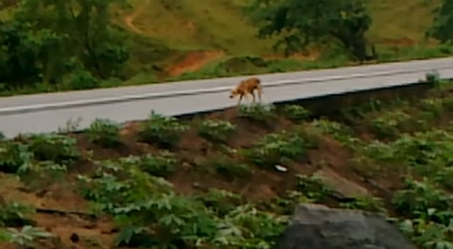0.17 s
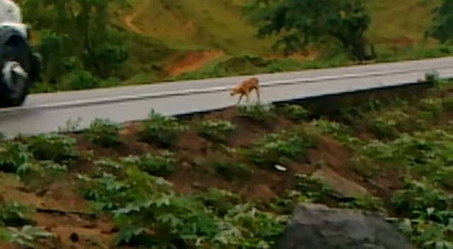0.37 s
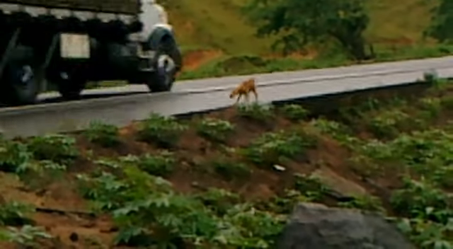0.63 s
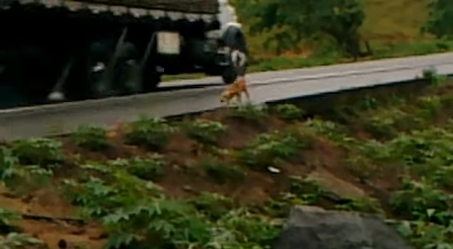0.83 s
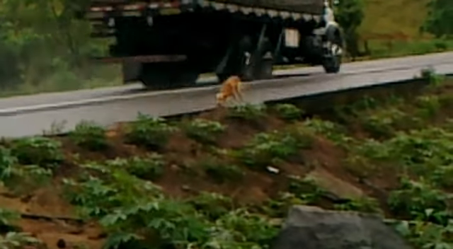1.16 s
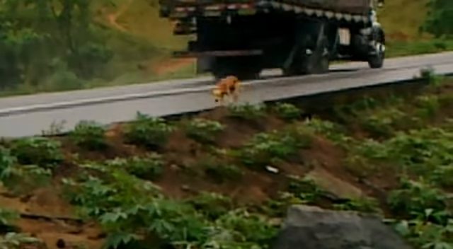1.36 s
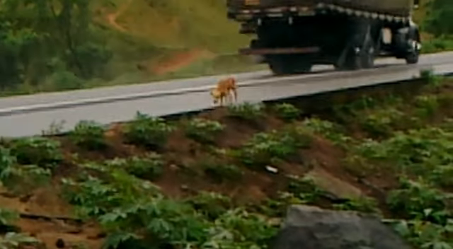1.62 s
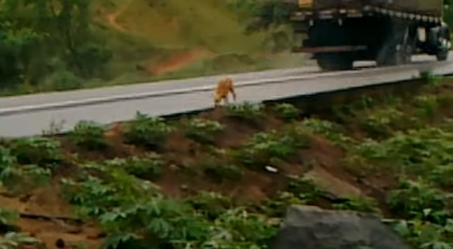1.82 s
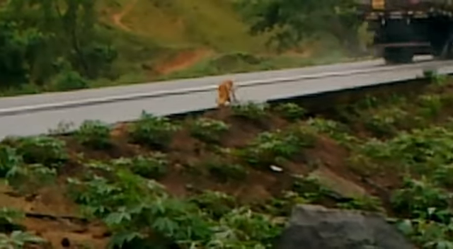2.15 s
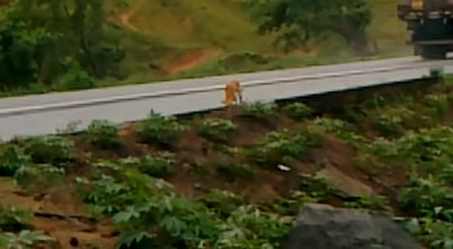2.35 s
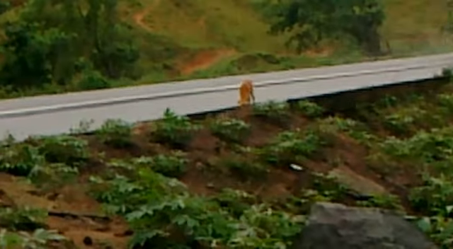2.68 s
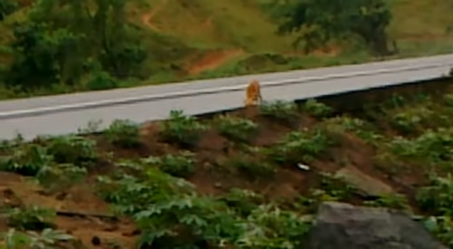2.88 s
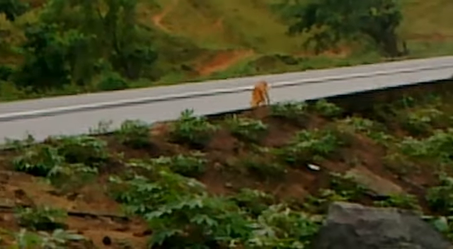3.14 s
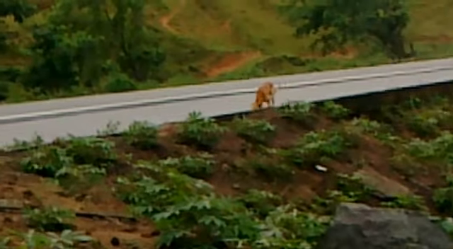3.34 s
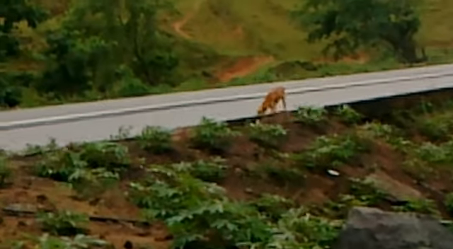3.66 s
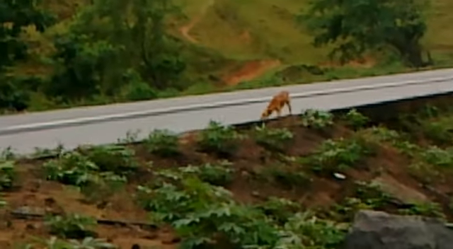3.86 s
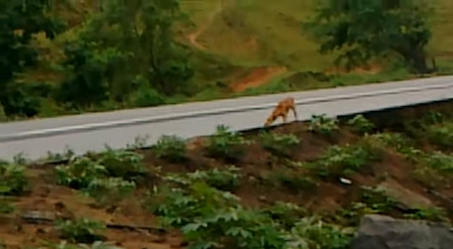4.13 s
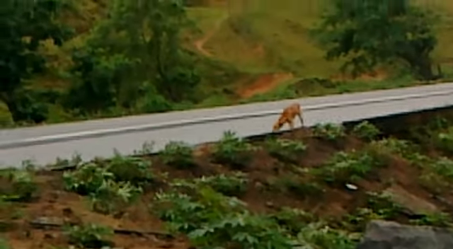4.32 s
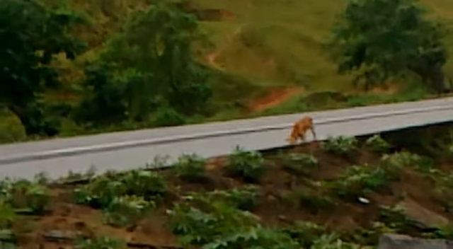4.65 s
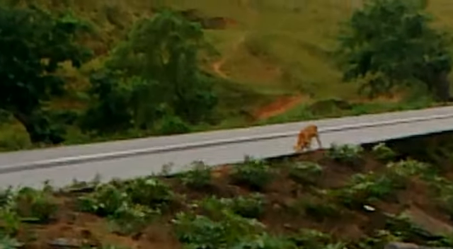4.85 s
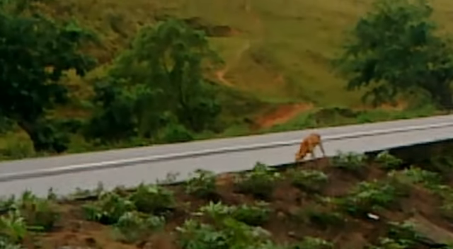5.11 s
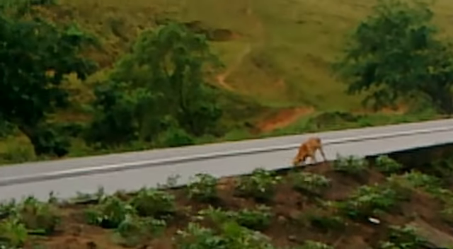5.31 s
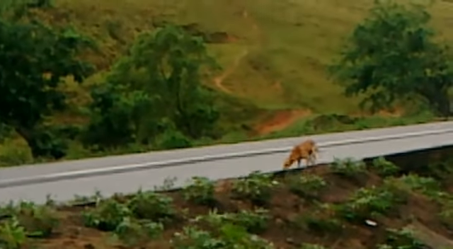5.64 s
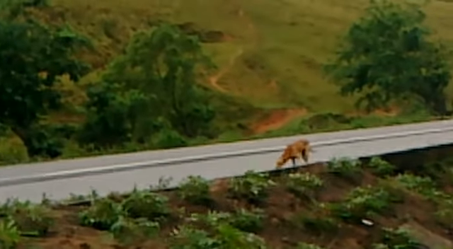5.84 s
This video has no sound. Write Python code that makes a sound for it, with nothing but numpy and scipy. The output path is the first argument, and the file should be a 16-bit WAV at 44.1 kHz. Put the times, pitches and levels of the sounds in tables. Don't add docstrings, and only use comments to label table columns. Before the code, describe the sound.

Close roadside pass of a big diesel truck: loud buzzing drone and tyre roar, pitch dropping, then a long dulling wet hiss as it recedes.

```python
import sys
import numpy as np
from scipy import signal
from scipy.io import wavfile

SR = 44100
rng = np.random.default_rng(int(sys.argv[2]) if len(sys.argv) > 2 else 0)


def master_out(mix):
    frames = np.transpose(np.atleast_2d(mix))
    ceiling = np.clip(frames, -1, 1)
    pcm = np.round(ceiling * 32767).astype(np.int16)
    wavfile.write(sys.argv[1], SR, pcm)


def boost(x):
    u = np.asarray(x, float) / 20
    return 10 ** u


N = 264159
STEP = 40
NEAREST_M, SPEED_M_S = 9.96, 19.8


def slow_time():
    return np.arange(N // STEP + 2) * STEP / SR


def every_sample(slow):
    return np.interp(np.arange(N) / STEP, np.arange(len(slow)), slow)


def in_time(rows):
    s, *columns = np.transpose(rows)
    return [np.interp(slow_time(), s, column) for column in columns]


def swells(rows):
    return sum(db * np.exp(-((slow_time() - s) / length) ** 2) for s, length, db in rows)


def rms_one(x):
    return x / np.sqrt(np.mean(x ** 2) + 1e-20)


def drift(rate_hz):
    r = np.exp(-2 * np.pi * STEP * rate_hz / SR)
    white = rng.standard_normal(N // STEP + 2002)
    return rms_one(signal.lfilter([1], [1, -2 * r, r * r], white)[2000:])


def passing(near_db, abreast_s, loss_factor, valley_db, far_tilt):
    distance_m = np.hypot(NEAREST_M, SPEED_M_S * (slow_time() - abreast_s))
    loss_db = 20 * np.log10(distance_m / NEAREST_M)
    direct = boost(near_db - loss_factor * loss_db)
    level_db = 20 * np.log10(np.hypot(direct, boost(valley_db)))
    return level_db, far_tilt * loss_db / 20


def roar(part, colour, shared_db, own_db, count):
    level_db, tilt = passing(*part)
    hz, per_hz_db = np.transpose(colour)
    edges = np.geomspace(hz[0], hz[-1], count + 1)
    white = rng.standard_normal((2, N + 8192))
    out, power = np.zeros(N), 0
    for k, (low, high) in enumerate(zip(edges, edges[1:])):
        centre = np.sqrt(low * high)
        bandpass = signal.butter(2, [low, high], "band", fs=SR, output="sos")
        band = signal.sosfilt(bandpass, white[k % 2])[-N:]
        octaves = np.log2(centre / np.sqrt(hz[0] * hz[-1]))
        gain = boost(np.interp(np.log(centre), np.log(hz), per_hz_db) + tilt * octaves)
        out += band * every_sample(gain * boost(own_db * drift(2.23)))
        power = power + gain ** 2 * np.mean(band ** 2)
    return out * every_sample(boost(level_db + shared_db) / np.sqrt(power))


def roadside(x):
    # centre_hz, width_hz, share_removed (ratio, negative adds), opens_s, full_s
    dips = [(440, 118, 0.73, 0.47, 0.52), (1104, 204, 0.63, 0.42, 0.8), (1580, 276, 1, 0.44, 9.1),
            (2086, 230, 0.46, -0.0055, 0.91), (2470, 260, -0.46, 1.72, 1.76),
            (2826, 154, 0.57, -0.83, 0.089), (3606, 560, 0.68, 0.17, 1.9), (4270, 150, -0.72, -0.82, 0.32),
            (4400, 690, 0.57, 0.72, 2.8), (5550, 170, 0.25, 1.2, 1.3), (8000, 910, 0.27, -0.78, 0.72),
            (5700, 820, 0.7, 0.5, 0.17), (405, 110, -.9, .65, .25), (7600, 600, -.3, 4.8, 5.3)]
    t = np.arange(N) / SR
    for hz, width, share, opens, full in dips:
        r = np.exp(-np.pi * width / SR)
        edge = (1 - r * r) / 2
        band = signal.lfilter([edge, 0, -edge], [1, -2 * r * np.cos(2 * np.pi * hz / SR), r * r], x)
        opening = np.clip((t - opens) / (full - opens), 0, 1)
        x = x - np.clip(share, -1, 1) * opening * band
    return x


def spray(gusts):
    # frequency_hz, level_db (per Hz)
    spray_colour = [(2900, -3.5), (3300, -0.5), (3900, -2), (4250, -0.5), (4600, -2.5), (5200, -3.5),
                    (6100, -2.5), (6800, -2.5), (7300, -12.5), (7700, -4)]
    mist_colour = [(7700, -1.5), (8800, 0), (9600, -2), (11000, -7.5)]
    air_colour = [(11000, -2), (13000, -4), (15000, -8), (16500, -13)]
    # abreast_db, abreast_s, loss_factor (ratio), valley_db, far_tilt_db (per octave)
    spray_pass = (-35, 0.62, 0.64, -48, -2)
    mist_pass = (-44.5, 0.91, 1.07, -70, -3)
    air_pass = (-53, 0.67, .85, -73, -.5)
    # centre_s, length_s, level_db
    puddles = [(1.2, 0.36, 1), (2.3, 0.55, 2), (3.1, 0.24, -0.5), (3.62, .06, 0.5), (3.85, 0.15, -1.5),
               (4.15, 0.04, 1), (4.8, 0.19, 3), (5.01, 0.062, -2.5), (5.344, 0.049, 3.5), (5.57, 0.052, 2),
               (5.75, .08, -2.5)]
    # centre_s, length_s, level_db
    splashes = [
        (1.4, .12, 2.5),
        (4.15, .045, 2),
        (5.34, .03, 1),
    ]
    # centre_s, length_s, level_db
    screened = [
        (0.29, 0.085, -2.5),
        (0.076, 0.15, 6),
        (0.54, .04, 1),
    ]
    # centre_s, length_s, level_db
    air_screened = [
        (.14, 0.12, 6),
        (.54, .045, 3.5),
        (.7, 0.13, -7),
        (.95, .2, -4),
        (1.4, .15, -1.5),
        (5.85, .2, 1),
    ]
    fine = 0.34 * swells(puddles) + swells(splashes)
    spray_db = swells(puddles) + .5 * swells(screened) + 0.59 * gusts
    water = roar(spray_pass, spray_colour, spray_db, own_db=1.0, count=14)
    water += roar(mist_pass, mist_colour, fine + swells(screened) + 0.58 * gusts, own_db=0.0, count=5)
    water += roar(air_pass, air_colour, fine + swells(air_screened) + .5 * gusts, own_db=0.5, count=4)
    return water


def treads(bumps):
    # frequency_hz, level_db (per Hz)
    tread_colour = [(340, -11.5), (450, -3.5), (550, -2), (660, 0.5), (820, -2), (960, -1.5), (1080, -10.5)]
    # abreast_db, abreast_s, loss_factor (ratio), valley_db, far_tilt_db (per octave)
    tread_pass = (-28, -0.16, 0.67, -41, -2.5)
    # centre_s, length_s, level_db
    surface = [
        (.3, 0.11, 0.5),
        (1.1, 0.23, 2),
        (2.6, 0.26, 0),
        (3.47, .12, -3.5),
        (4.1, 0.24, 1),
        (5.0, 0.084, 2.5),
        (5.5, 0.23, 1),
    ]
    return roar(tread_pass, tread_colour, swells(surface) + .5 * bumps, own_db=0.15, count=8)


def clatter(gusts):
    # frequency_hz, level_db (per Hz)
    clatter_colour = [(1080, 1.5), (1400, -1), (1900, 0.5), (2450, -2), (2700, -4), (2900, -7.5)]
    # abreast_db, abreast_s, loss_factor (ratio), valley_db, far_tilt_db (per octave)
    clatter_pass = (-25.5, 0, 1.0, -43, -1.5)
    # centre_s, length_s, level_db
    bends = [
        (.3, 0.081, -2.5),
        (1.1, 0.32, -2),
        (2.3, .5, 2),
        (3.9, .3, -1.5),
        (4.82, .1, 2.5),
        (5.1, 0.079, -1.5),
        (5.7, 0.41, 1.5),
    ]
    return roar(clatter_pass, clatter_colour, swells(bends) + .5 * gusts, own_db=1.62, count=9)


def knock(s, hz, length, level_db):
    bandpass = signal.butter(2, [hz / 1.12, hz * 1.12], "band", fs=SR, output="sos")
    band = signal.sosfilt(bandpass, rng.standard_normal(N))
    return boost(level_db) * rms_one(band) * np.exp(-((np.arange(N) / SR - s) / length) ** 2)


def body_rumble(bumps):
    # frequency_hz, level_db (per Hz)
    rumble_colour = [(18, -31), (32, -10.5), (59, -27), (78, -1.5), (92, -0.5), (112, -1.5), (130, -7),
                     (170, -10.5)]
    drum_colour = [(170, 3), (210, -7.5), (250, -8), (300, -7.5), (345, -9.5)]
    # abreast_db, abreast_s, loss_factor (ratio), valley_db, far_tilt_db (per octave)
    rumble_pass = (-37.5, 0.56, 0.16, -43, -1.0)
    drum_pass = (-32.5, -.1, 1.48, -55, -4)
    # centre_s, length_s, level_db
    tarmac = [
        (.3, .15, 1),
        (1.3, 0.49, -3.5),
        (2.3, 0.71, 2.5),
        (3.54, 0.21, -4),
        (4.05, 0.24, 4),
        (4.62, .2, -3),
        (5.12, 0.23, 2.5),
        (5.9, .2, -3),
    ]
    # centre_s, length_s, level_db
    bounces = [
        (.3, 0.14, -4.5),
        (2.3, .5, 6),
        (3.0, 0.27, 5.5),
        (4.2, 0.18, 3.5),
        (5.0, .2, 6.5),
    ]
    # centre_s, centre_hz, length_s, level_db
    thump = (5.47, 430, .055, -46)
    body = roar(rumble_pass, rumble_colour, swells(tarmac) + 2.5 + .5 * bumps, own_db=.6, count=12)
    body += roar(drum_pass, drum_colour, swells(bounces) + 5 + 0.58 * bumps, own_db=-0.8, count=4)
    return body + knock(*thump)


def firing_rate():
    firing_hz, sag_hz_per_s, climb_from_s = 95.3, .46, 2.05
    tailpipe_abreast_s, sound_m_s = 0.199, 343
    along_m = SPEED_M_S * (slow_time() - tailpipe_abreast_s)
    engine_hz = firing_hz - sag_hz_per_s * np.maximum(slow_time() - climb_from_s, 0)
    return engine_hz * (1 - SPEED_M_S / sound_m_s * along_m / np.hypot(NEAREST_M, along_m))


def exhaust():
    # time_s, level_db
    drone_levels = [(0.0, -16.5), (0.5, -17.5), (0.62, -18.4), (0.9, -22), (1.1, -23.4), (1.3, -25),
                    (1.9, -26), (2.0, -27.2), (2.14, -25), (2.98, -25), (3.12, -21.5), (3.26, -24.2),
                    (3.68, -24), (4.1, -24.5), (5.99, -25.5)]
    # abreast_db, abreast_s, loss_factor (ratio), valley_db, far_tilt_db (per octave)
    second_pass = (-22.5, .1, 1.48, -46, 0)
    third_pass = (-26.5, 0.33, 2, -47.5, 0)
    # centre_s, length_s, level_db
    second_fades = [(.25, 0.13, -1), (.62, 0.12, -6.5), (1.45, 0.24, 3), (1.75, 0.16, 4.5), (2.1, 0.15, -5),
                    (2.35, .2, -7.5), (2.75, 0.068, -9), (3.15, 0.23, -4), (3.88, .12, -4), (4.11, 0.11, 7),
                    (5.38, .12, 3), (5.9, 0.23, -4)]
    # centre_s, length_s, level_db
    third_fades = [
        (.61, 0.092, -8.5),
        (.9, 0.17, 2),
        (1.4, 0.099, -9),
        (2.15, 0.4, 3.5),
        (3.27, 0.28, -7),
        (4.03, 0.21, -9),
        (4.85, 0.16, 2),
        (5.08, .07, -5),
        (5.75, .25, 4),
    ]
    # centre_s, length_s, level_db
    fourth_swell = [
        (3.4, .8, 11),
    ]
    # time_s, lag_rad (per multiple)
    pulse_skew = [(0, .5), (.4, 1.0), (6, .9)]
    # multiple (ratio), under_first_db, under_second_db
    uneven = [(2 / 3, -25, -17), (4 / 3, -25.5, -28), (3 / 2, -39, -18), (5 / 2, -37.5, -22),
              (8 / 3, -30.5, -16.5), (7 / 2, -47, -15)]

    first_db, = in_time(drone_levels)
    second_db = passing(*second_pass)[0] + swells(second_fades)
    third_db = passing(*third_pass)[0] + swells(third_fades)
    fourth_db = np.maximum(1.35 * third_db - 3, -66 + swells(fourth_swell))
    phase = 2 * np.pi * np.cumsum(every_sample(firing_rate())) / SR
    phase = phase + every_sample(.03 * drift(6))
    skew = every_sample(*in_time(pulse_skew))
    # level_db, flutter_db
    lines = ((first_db, .8), (second_db + .8, .5), (third_db + .8, .5), (fourth_db, 2.0))
    out = np.zeros(N)
    for k, (line_db, flutter_db) in enumerate(lines):
        level = every_sample(boost(line_db + flutter_db * drift(10.2)))
        out -= level * np.cos((k + 1) * phase - k * skew)
    for multiple, under_first_db, under_second_db in uneven:
        wander = every_sample(1.43 * drift(4.3))
        level = np.hypot(boost(first_db + under_first_db), boost(second_db + under_second_db))
        out += every_sample(level * boost(1.8 * drift(2.3))) * np.cos(multiple * phase + wander)
    return np.sqrt(2) * out, phase


def scene():
    drone, phase = exhaust()
    throb = 1 + .08 * np.cos(phase)
    gusts, bumps = drift(20), drift(5.2)
    reflected = roadside(throb * (treads(bumps) + clatter(gusts)) + spray(gusts))
    return (drone + body_rumble(bumps) + reflected)[None]


def low_pass(x):
    return signal.sosfilt(signal.butter(12, 15730, fs=SR, output="sos"), x)


def record(dry):
    closing = np.minimum((N - np.arange(N)) / (.002 * SR), 1)
    return low_pass(dry * closing)


dry = scene()
out = record(dry)
master_out(out)
```